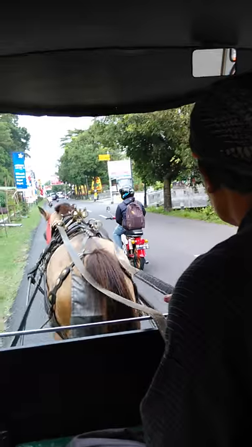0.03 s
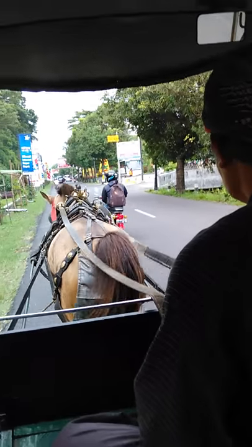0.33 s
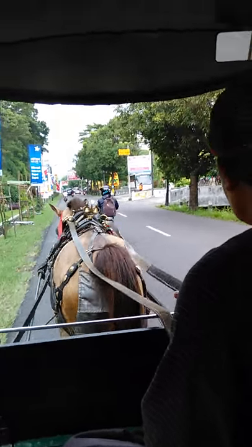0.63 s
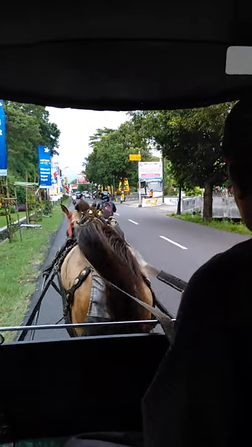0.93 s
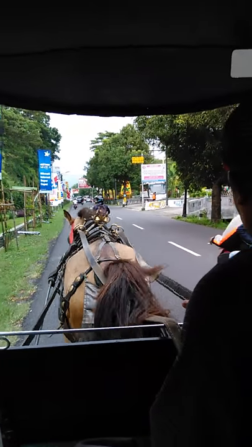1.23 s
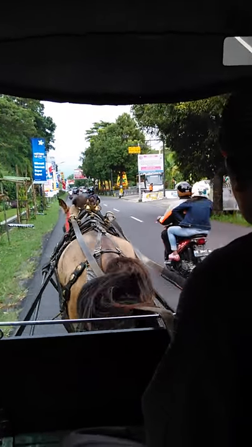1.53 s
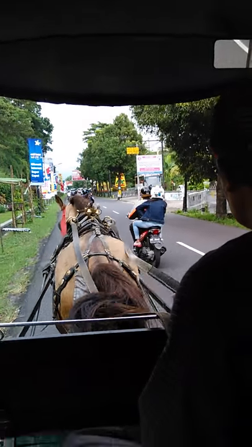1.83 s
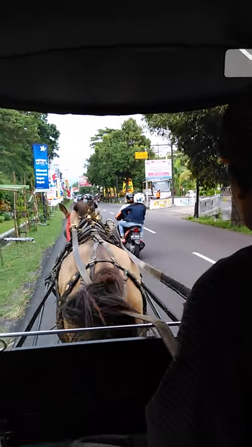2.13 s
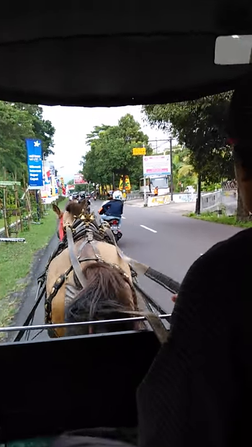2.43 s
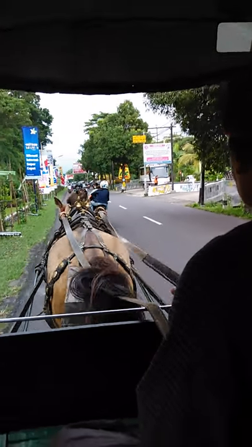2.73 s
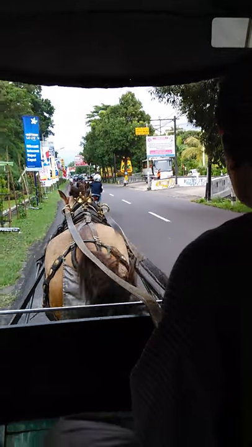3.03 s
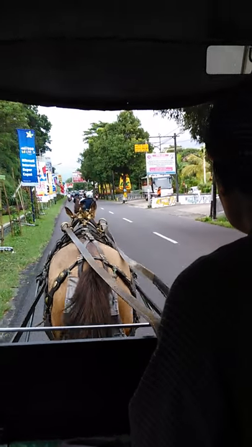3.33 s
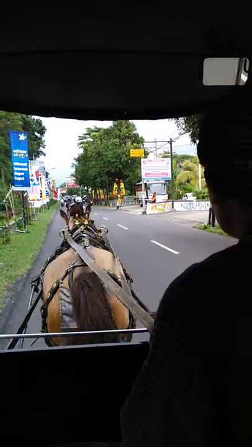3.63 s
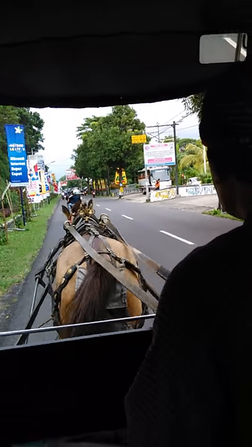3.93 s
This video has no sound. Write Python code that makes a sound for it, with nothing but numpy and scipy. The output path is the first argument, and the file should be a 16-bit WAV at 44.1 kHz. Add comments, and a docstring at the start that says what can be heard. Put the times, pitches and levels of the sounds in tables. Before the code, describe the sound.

A horse trots on asphalt with hollow, gritty clip-clops, heard from the carriage it pulls. Harness bells jingle and fittings rattle on the left. Motorcycles hum past and fade halfway through, leaving low wheel rumble under the hooves.

```python
"""A horse trots on asphalt, heard from the carriage it pulls. Each shod hoof rings hollow, crushes grit
and slides, and some scuff the road. On the left a shaft knocks, loose pellets jingle in the harness
bells and small metal fittings rattle. Motorcycle engines hum past until about two seconds in,
then fade, leaving the rumble of the wheels and the soft knocks of the wooden body under the trot."""
import sys
import numpy as np
from scipy import signal
from scipy.fft import rfft, irfft
from scipy.io import wavfile

SR = 44100
rng = np.random.default_rng(int(sys.argv[2]) if len(sys.argv) > 2 else 0)


def persist_wave(psi):
    """Save psi, clipped to +-1, as 16-bit WAV."""
    counts = np.round(np.clip(psi, -1, 1) * 32767).astype(np.int16)
    wavfile.write(sys.argv[1], SR, np.atleast_2d(counts).T)


N = 176400
T = np.arange(N) / SR

# hoof landings: (time [s], clop level [dB], pitch [Hz], crunch level [dB], slide level [dB])
LANDINGS = [(.608, -15, 1078, -16, -27.5), (.942, -24.5, 1175, -26, -31.5), (1.222, -21, 1110, -26, -34.5),
            (1.242, -26, 1310, -37, -40), (1.503, -23.5, 1161, -53, -41), (1.544, -21.5, 1147, -54, -30),
            (1.836, -20, 1096, -27.5, -28.5), (2.133, -32.5, 1390, -50, -43),
            (2.154, -29.5, 1175, -48, -39), (2.456, -14, 1068, -23, -31.5), (2.767, -37, 1300, -48, -34),
            (2.786, -28, 1183, -47, -50), (3.078, -18, 1127, -36, -31.5), (3.39, -36, 1210, -54, -41),
            (3.691, -20, 1033, -38, -29.5), (3.974, -30, 1362, -42, -36.5)]
# how hard the harness shakes: (time [s], level [dB])
HARNESS_SHAKE = [(.35, -38), (.55, -37.5), (.7, -32.5), (.95, -35), (1.15, -37.5), (1.55, -38.5),
                 (2.05, -41), (2.3, -39.5), (3.0, -41.5), (3.4, -41.5), (4, -41)]


def from_db(db):
    """Decibels to gain."""
    return 10 ** (np.asarray(db) / 20)


def lean_left(right_db):
    """Stereo gains that turn down the right channel."""
    return from_db([[0], [right_db]])


def unit_rms(x):
    """Scale to unit power."""
    return x / np.sqrt(np.mean(x ** 2) + 1e-20)


def in_time(rows):
    """Columns of an automation curve at every sample."""
    times, *columns = np.transpose(rows)
    return [np.interp(T, times, c) for c in columns]


def at_hz(rows, hz):
    """Columns of a spectrum at the given frequencies."""
    freqs, *columns = np.transpose(rows)
    return [np.interp(np.log(hz + 1), np.log(freqs), c) for c in columns]


def drift(rate):
    """Smooth random wander of unit power, with `rate` turning points a second."""
    return unit_rms(np.interp(T * rate, np.arange(N // 20), rng.standard_normal(N // 20)))


def any_phase():
    """A random starting phase."""
    return rng.uniform(0, 2 * np.pi)


def jitter(spread):
    """A random offset within plus or minus the spread."""
    return spread * rng.uniform(-1, 1)


def random_times(per_s):
    """Times of events scattered at an average rate."""
    return T[rng.random(N) < per_s / SR]


def add_hit(out, s, db, rise, t60, hz=0, phase=0):
    """Add a linear attack and exponential decay at time s; with a frequency, one ringing mode."""
    first = int(np.clip(s * SR, 0, N - 1))
    t = T[:min(N - first, int((rise + t60) * SR))]
    attack = np.minimum(t / max(rise, 1 / SR), 1)
    decay = np.exp(-np.log(1000) * np.maximum(t - rise, 0) / t60)
    out[first:first + len(t)] += from_db(db) * attack * decay * np.cos(2 * np.pi * hz * t + phase)


def hit(*shape, **settings):
    """One hit on a track of its own."""
    out = np.zeros(N)
    add_hit(out, *shape, **settings)
    return out


def ring_out(pulses, t60):
    """Give every pulse an exponential tail."""
    return signal.lfilter([1], [1, -np.exp(-np.log(1000) / (t60 * SR))], pulses)


def noise(spectrum, right_db=None):
    """Coloured stereo noise, spread over the road or, given right_db, leaning left."""
    # stereo image: (frequency [Hz], left-right correlation [0-1], left minus right [dB])
    image = [(35, 0.9, -7), (129, .9, 3.5), (300, 0.74, 2), (680, 0.71, 2), (1340, 0, 3), (2340, 0.2, 3.5),
             (4600, 0, -1.5), (7200, 0.2, 3), (9200, 0, 15.5), (16000, 0, 22)]
    hz = np.arange(N // 2 + 1) * SR / N
    alike, pan_db = at_hz(image, hz)
    mid, side = rfft(rng.standard_normal((2, N))) * from_db(at_hz(spectrum, hz)[0])
    sign = np.array([[1], [-1]])
    stereo = np.sqrt(1 + alike) * mid + sign * np.sqrt(1 - alike) * side
    if right_db is None:
        return unit_rms(irfft(stereo * from_db(sign * pan_db / 2), N))
    return unit_rms(irfft(stereo, N)) * lean_left(right_db)


def reflect(knocks, echo_db=-3):
    """A knock reaches both ears directly and as a short scatter off road and canopy."""
    tail = rng.standard_normal((2, N)) * hit(s=0.0025, db=0, rise=0, t60=0.11)
    tail /= np.sqrt(np.sum(tail ** 2, axis=1, keepdims=True))
    echo = signal.fftconvolve(knocks[None], tail[:, :SR // 2])[:, :N]
    direct = np.array([np.roll(knocks, shift=2), knocks])
    return (direct + from_db(echo_db) * echo) * lean_left(-6)


def motorcycles(waver=0.00397, rough_db=1.15):
    """Engines hum in harmonics of the firing rate, over exhaust rumble and tyre rush."""
    # engine: (time [s], firing rate [Hz], harmonic 2 [dB], harmonic 4 [dB], other harmonics [dB])
    engine = [(.35, 37.83, -33.5, -40, -42), (.55, 37.55, -34, -42, -38), (.85, 37.33, -34.5, -38, -36),
              (1.03, 37.32, -41, -31.5, -38), (1.3, 37.07, -45, -31.5, -37), (1.55, 36.93, -43, -34.5, -39),
              (1.8, 36.81, -39, -32, -41.5), (1.92, 36.75, -46, -31.5, -39.5), (1.96, 36.87, -47, -50, -48),
              (2.5, 36.3, -62, -50.5, -60), (4, 36.7, -54.5, -64, -52)]
    # balance of the other harmonics: (harmonic number, level offset [dB])
    overtones = [(3, -13.5), (5, -2.5), (6, -19), (7, -16), (8, -12), (10, -12), (12, -9), (14, -15.5)]
    # exhaust and tyres: (time [s], rumble level [dB], rush level [dB])
    pass_by = [(.35, -34.5, -35.5), (.55, -33.5, -33.5), (.7, -34.5, -32), (.88, -37, -32.5),
               (1.02, -33, -35.5), (1.45, -36.5, -37.5), (1.65, -38, -38), (1.76, -32, -39),
               (1.92, -38.5, -39.5), (2.02, -48, -51.5), (2.4, -74, -58), (4, -45, -69)]
    # exhaust rumble: (frequency [Hz], relative level [dB])
    exhaust_eq = [(25, -32), (45, -7.5), (70, 1), (130, 0), (190, -3.5), (260, -9.5), (450, -11),
                  (700, -21), (1500, -56)]
    # tyre rush: (frequency [Hz], relative level [dB])
    tyre_eq = [(200, -13), (450, 2), (600, -1), (780, 3.5), (1000, 1.5), (1700, 0), (3000, -3.5),
               (5500, -6), (8000, -12), (12000, -15.5), (16000, -37)]
    firing_hz, second_db, fourth_db, others_db = in_time(engine)
    phase = 2 * np.pi * np.cumsum(firing_hz * (1 + waver * drift(12))) / SR
    harmonics = [(2, second_db), (4, fourth_db)] + [(k, others_db + db) for k, db in overtones]
    hum = sum(np.sqrt(2) * from_db(db + rough_db * drift(18)) * np.sin(k * phase + any_phase())
              for k, db in harmonics)
    rumble_db, rush_db = in_time(pass_by)
    rumble = from_db(rumble_db) * noise(exhaust_eq)
    rush = from_db(rush_db) * noise(tyre_eq)
    return hum * lean_left(-2) + rumble + rush


def gear_whine(width_hz=150):
    """A rough, narrow band of gear noise sinks as the first motorcycle pulls away."""
    # falling whine: (time [s], pitch [Hz], level [dB])
    glide = [(.35, 860, -49), (.5, 835, -39.5), (.7, 785, -39.5), (.9, 735, -40), (1.05, 715, -55),
             (1.4, 700, -69)]
    hz, db = in_time(glide)
    phase = 2 * np.pi * np.cumsum(hz) / SR
    band = drift(width_hz) * np.cos(phase) + drift(width_hz) * np.sin(phase)
    return from_db(db) * band * lean_left(-3)


def wheels(level_db=-47, bump_db=2):
    """The carriage rumbles over uneven asphalt."""
    # rolling wheels: (frequency [Hz], relative level [dB])
    wheel_eq = [(25, -10), (40, -9.5), (80, 2), (150, -1), (230, -9), (450, -12.5), (1000, -16),
                (2000, -19.5), (3500, -25.5), (6000, -32.5), (16000, -43)]
    return from_db(level_db + bump_db * drift(25.196)) * noise(wheel_eq)


def carriage_body(soft_db=-51, low_hz=246, high_hz=943):
    """The wooden body knocks softly at random, and harder at a few jolts."""
    # harder knocks of the wood: (time [s], level [dB], pitch [Hz])
    jolts = [(2.207, -38.5, 640), (2.235, -40.5, 377), (3.81, -40, 403), (3.92, -37.5, 703)]
    soft_knocks = [(s, soft_db + jitter(5), low_hz * (high_hz / low_hz) ** rng.random())
                   for s in random_times(per_s=90)]
    knocks = np.zeros(N)
    for s, db, hz in list(jolts) + soft_knocks:
        add_hit(knocks, s, db, rise=.003, t60=0.054, hz=hz, phase=any_phase())
    return reflect(knocks)


def harness_rattle(touches_per_s=470, spread_db=5, touch_t60=0.11, power_floor=0.31, right_db=-22.5):
    """Small metal parts rattle all the time; the harder clinks stand out and ring briefly."""
    # buckles and links knock together, and at 1.998, 3.451 and 3.851 s a bell's pellet clicks as it jingles:
    # (time [s], level [dB])
    clinks = [(.611, -17), (0.695, -20), (1.058, -23), (1.566, -26), (1.849, -30), (1.926, -24),
              (2.147, -26), (2.199, -25), (2.276, -21.5), (2.693, -32.5), (2.777, -23), (2.897, -24),
              (3.022, -29), (3.197, -27.5), (3.236, -27), (3.316, -33), (3.377, -29), (3.512, -27.5),
              (3.626, -15.5), (3.693, -21), (3.753, -23.5), (3.929, -28.5), (1.998, -32), (3.451, -34),
              (3.851, -34), (3.975, -25)]
    # harness metal: (frequency [Hz], relative level [dB])
    metal_eq = [(3000, -52), (7000, -9.5), (8600, -3.5), (9900, 6), (10700, 2), (12300, -12), (16000, -29)]
    sizes = from_db(spread_db * np.minimum(rng.exponential(1, N), 4))
    touches = sizes ** 2 * (rng.random(N) < touches_per_s / SR)
    power = ring_out(touches, touch_t60 / 2)  # power dies twice as fast as amplitude
    flicker = unit_rms(np.sqrt(power / power.mean() + power_floor))
    rattle = from_db(in_time(HARNESS_SHAKE)[0]) * flicker
    rise, t60 = 0.00084, 0.033
    bursts = sum(hit(s, db, rise, t60) for s, db in clinks)
    rings = sum(hit(s, db - 2, rise, t60, hz=10200 + jitter(450), phase=any_phase()) for s, db in clinks)
    return np.hypot(rattle, bursts / 2) * noise(metal_eq, right_db) + rings * lean_left(right_db)


def link_pings(base_db=-39, low_hz=8830, high_hz=11440):
    """Links of many sizes touch at random and ring briefly, louder when the harness shakes."""
    pings = np.zeros(N)
    for s in random_times(per_s=70):
        db = base_db + jitter(5)
        add_hit(pings, s, db, rise=0, t60=0.057, hz=rng.uniform(low_hz, high_hz), phase=any_phase())
    shake_db, = in_time(HARNESS_SHAKE)
    return pings * from_db(shake_db - shake_db.mean()) * lean_left(-22.5)


def bell_mode(hits, hz, t60, flutter_per_s=45, depth=0.15, turn_rad=0.75):
    """One mode, pushed by each hit while it swells, flutters in level and phase as the bell swings."""
    push = np.zeros(N + SR, complex)
    for s, db, rise in hits:
        first, length = int(s * SR), int(rise * SR) + 1
        push[first:first + length] += from_db(db) * np.exp(1j * any_phase()) / length
    ring = ring_out(push[:N] + 1e-18, t60) * np.exp(2j * np.pi * hz * T)
    swing = np.array([depth * drift(flutter_per_s) + 1j * turn_rad * drift(flutter_per_s)
                      for ear in "LR"])
    return np.real(ring * np.exp(swing))


def pellet_bell(jingles, modes, pitches_hz, swell_s=0.0019, bounce_s=.024, bounce_db=-8, roll_db=-54):
    """A loose pellet strikes the shell, bounces once and rolls on; duller jingles swell more slowly."""
    strikes = [(s, lower, upper, swell_s * from_db(lower - upper)) for s, lower, upper in jingles]
    bounces = [(s + bounce_s * (1 + jitter(.5)), lower + bounce_db, upper + bounce_db, 0)
               for s, lower, upper in jingles]
    rolls = [(s, roll_db, roll_db, 0) for s in random_times(per_s=20)]
    times, lower_db, upper_db, swells = np.transpose(strikes + bounces + rolls)
    shell = 0
    for hz, (gain_db, t60) in zip(pitches_hz, modes):
        drive_db = upper_db if hz == pitches_hz[-1] else lower_db  # the top mode is the upper ring
        shell = shell + bell_mode(zip(times, drive_db + gain_db, swells), hz, t60)
    return shell


def harness_bells():
    """Two nearly alike bells beat against each other; a tiny one tinkles above them."""
    # the tiny bell is struck: (time [s], level [dB])
    tinkles = [(.348, -33), (.685, -38), (.977, -25), (1.924, -37), (2.195, -39), (3.021, -39),
               (3.383, -34)]
    # the louder bell is shaken: (time [s], lower ring [dB], upper ring [dB])
    loud_jingles = [(.348, -39, -44), (.76, -48, -34), (.897, -27, -50), (1.38, -37, -30.5),
                    (1.58, -33.5, -45), (1.674, -32, -38), (1.803, -37, -46), (1.997, -35, -38),
                    (2.152, -28.5, -44), (2.21, -29, -39), (2.274, -27, -29), (2.43, -33.5, -40),
                    (2.545, -39, -49), (2.601, -27.5, -32), (2.66, -42, -41), (2.725, -35, -50),
                    (2.758, -27.5, -46), (2.897, -43, -37.5), (3.041, -30.5, -34), (3.236, -34, -32),
                    (3.39, -37.5, -40), (3.45, -31.5, -37), (3.511, -38, -42), (3.685, -38.5, -44),
                    (3.792, -34.5, -32), (3.852, -31.5, -41), (3.988, -39, -33)]
    # its shell modes, low to high: (gain [dB], t60 [s])
    loud_modes = [(6, 0.23), (-13, .4), (-16, 0.3), (-2.5, 0.09), (6.5, 0.22)]
    # the softer bell is shaken: (time [s], lower ring [dB], upper ring [dB])
    soft_jingles = [(.348, -36, -48), (.76, -50, -40), (.9, -40, -43), (1.028, -44, -37), (1.213, -43, -47),
                    (1.335, -34.5, -48), (1.38, -34, -39), (1.803, -36, -39), (1.925, -44, -40),
                    (1.997, -40, -47), (2.152, -45, -40), (2.21, -37, -45), (2.274, -34.5, -50),
                    (2.601, -43, -52), (2.82, -45, -41), (2.897, -44.5, -52), (3.236, -36, -46),
                    (3.511, -38, -42), (3.852, -43, -35)]
    # its shell modes, low to high: (gain [dB], t60 [s])
    soft_modes = [(4.5, 0.56), (6, .36)]
    tiny_rise_s = 0.0038
    tiny = bell_mode([(s, db, tiny_rise_s) for s, db in tinkles], hz=14908, t60=0.22)
    loud = pellet_bell(loud_jingles, loud_modes, pitches_hz=[8474, 8857, 9199, 9738, 13865])
    soft = pellet_bell(soft_jingles, soft_modes, pitches_hz=[8556, 13455])
    return (tiny + loud + soft) * lean_left(-16.5)


def shaft(rise=0.00045, detune=0.027):
    """A shaft knocks in its harness loop, dry and close on the left, in step with the trot."""
    # knocks in the loop: (time [s], level [dB])
    knocks = [(.366, -29.5), (.933, -21), (1.504, -25), (1.649, -25), (1.785, -33), (1.988, -31.5),
              (2.14, -28), (2.388, -31), (2.696, -26), (3.41, -32), (3.577, -36.5), (3.6262, -16.5),
              (3.866, -33), (3.978, -29)]
    # resonances of the shaft: (frequency [Hz], gain [dB], t60 [s])
    modes = [(1056, -13, 0.032), (1995, -0.5, 0.021), (2494, -8, 0.019), (3200, -11.5, 0.008),
             (5750, -20, .012), (6900, -15, .012)]
    out = np.zeros(N)
    for s, db in knocks:
        for hz, gain_db, t60 in modes:
            add_hit(out, s, db + gain_db, rise, t60, hz * (1 + jitter(detune)), any_phase())
    return out * lean_left(-15.5)


def hooves(clop_rise=0.0014, vary_db=3, detune=0.036, slide_lead_s=0.014):
    """Each landing rings the hollow hoof, crushes grit, slides briefly and scatters a few grains."""
    # resonances of the hoof: (frequency [multiple of its pitch], gain [dB], t60 [s])
    modes = [(.8, -25, 0.028), (1.001, -2, 0.02), (1.3, -14.5, 0.027), (1.65, -23, 0.012),
             (2.42, -12.5, 0.013), (3.85, -19, 0.02)]
    # grit crushed under a shoe: (frequency [Hz], relative level [dB])
    crunch_eq = [(300, -37), (900, 4), (2500, 3), (3500, 1.5), (5500, 7.5), (7500, -6.5), (10300, 4),
                 (12500, -13), (16000, -34)]
    # grit under a sliding shoe: (frequency [Hz], relative level [dB])
    slide_eq = [(800, -8.5), (2500, -2.5), (4000, -5), (6500, 3.5), (10000, 2), (12500, -6.5), (16000, -32)]
    clops, crunch_env, slide_env = np.zeros((3, N))
    for s, clop_db, hz, crunch_db, slide_db in LANDINGS:
        for ratio, gain_db, t60 in modes:
            mode_db = clop_db + gain_db - jitter(vary_db)
            mode_hz = hz * ratio * (1 + jitter(detune))
            add_hit(clops, s, mode_db, clop_rise, t60, mode_hz, any_phase())
        add_hit(crunch_env, s, crunch_db, rise=0.0039, t60=0.032)
        add_hit(slide_env, s - slide_lead_s, slide_db, rise=0.012, t60=0.088)
        add_hit(slide_env, s, slide_db - 9, rise=0.012, t60=0.52)  # loosened grit skitters on
    # a fast flicker in level makes the noise grainy
    crunch = crunch_env * noise(crunch_eq) * unit_rms(from_db(2 * drift(740)))
    slide = slide_env * noise(slide_eq) * unit_rms(from_db(3 * drift(700)))
    return reflect(clops) + crunch + slide


def hoof_scuffs(rise=0.0127, t60=0.31, landed_hz=1165, sag_hz_per_s=11000, width_hz=420):
    """A dragged hoof rubs its hollow into a rough ring, which sinks in pitch until the hoof is down."""
    # soft drags of a hoof: (time [s], level [dB])
    scuffs = [(1.205, -34), (1.53, -35), (1.82, -39), (2.119, -39.5), (2.289, -51), (2.477, -45),
              (2.76, -45), (3.09, -50), (3.366, -44), (3.705, -43), (3.956, -37.5)]
    landing_times = np.array(LANDINGS)[:, 0]
    ring = 0
    for s, db in scuffs:
        nearest_landing = landing_times[np.argmin(abs(landing_times - s - 2 * rise))]
        hz = landed_hz + sag_hz_per_s * np.maximum(nearest_landing - T, 0)
        ring = ring + hit(s, db, rise, t60) * np.exp(2j * np.pi * np.cumsum(hz) / SR)
    rubbing = np.array([drift(width_hz) + 1j * drift(width_hz) for ear in "LR"])
    return np.real(ring * rubbing) * lean_left(-3)


def scene():
    """Horse, harness, traffic and carriage, heard from the seat."""
    horse = hooves() + hoof_scuffs()
    tack = shaft() + harness_bells() + harness_rattle() + link_pings()
    traffic = motorcycles() + gear_whine()
    return horse + tack + traffic + wheels() + carriage_body()


def record(dry, ceiling=.6, start_s=.346, cutoff_hz=16000):
    """Silence until the sound cuts in; peaks are soft-clipped and the top end is cut steeply."""
    rounded = ceiling * np.tanh(dry / ceiling)
    lowpass = signal.ellip(10, .1, 80, cutoff_hz, fs=SR, output="sos")
    return signal.sosfilt(lowpass, rounded * (T >= start_s))


dry = scene()
out = record(dry)
persist_wave(out)
```